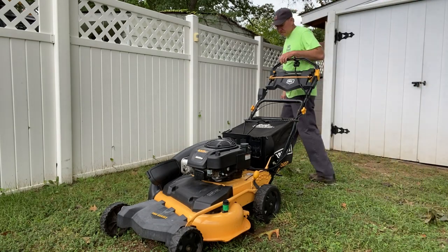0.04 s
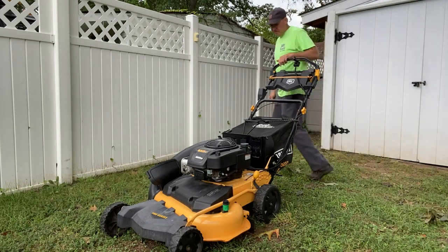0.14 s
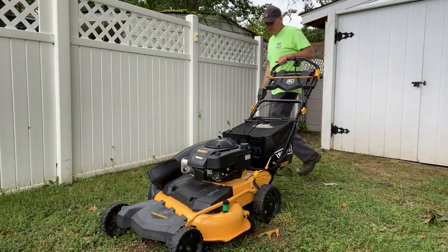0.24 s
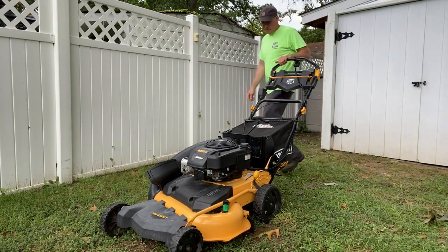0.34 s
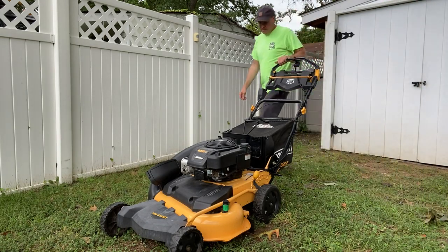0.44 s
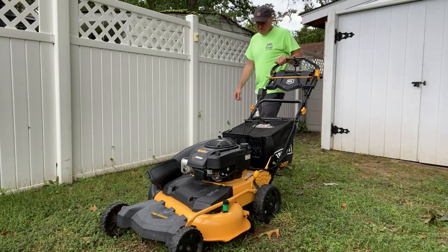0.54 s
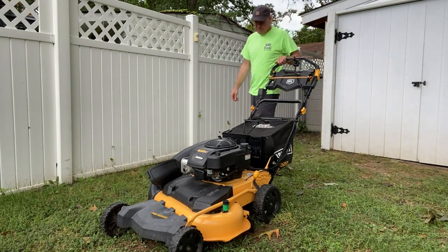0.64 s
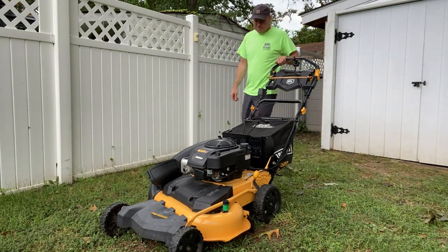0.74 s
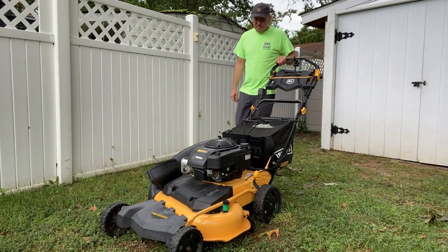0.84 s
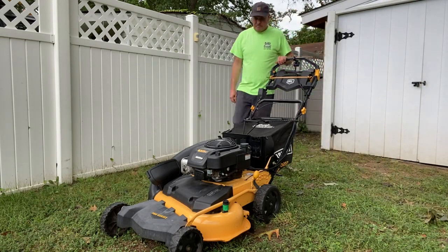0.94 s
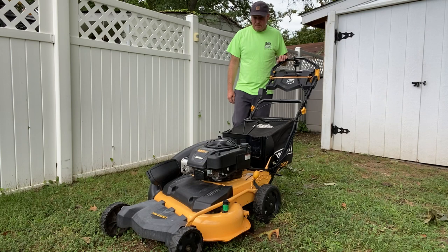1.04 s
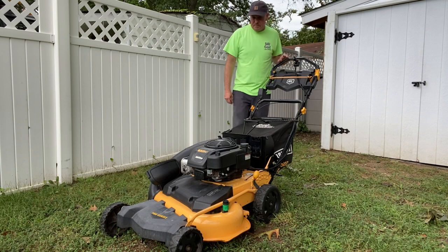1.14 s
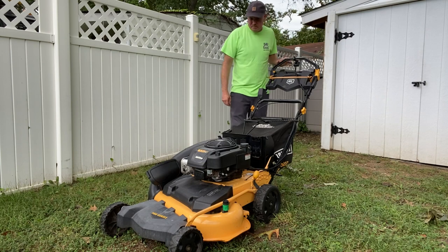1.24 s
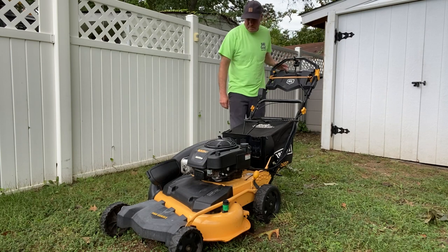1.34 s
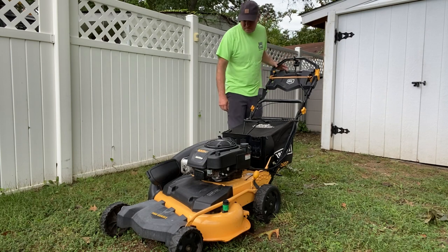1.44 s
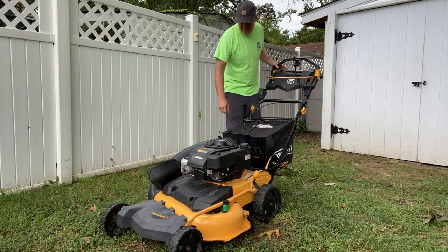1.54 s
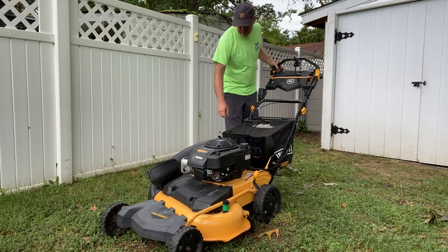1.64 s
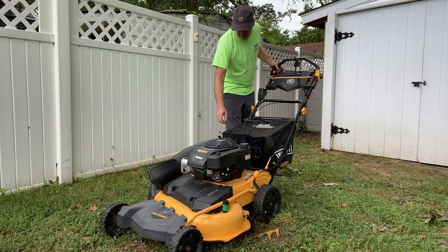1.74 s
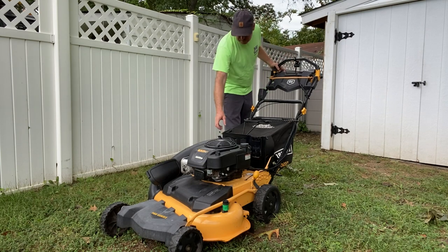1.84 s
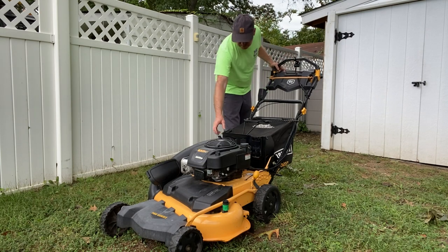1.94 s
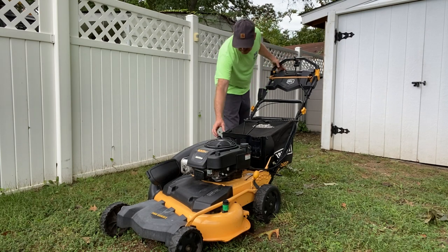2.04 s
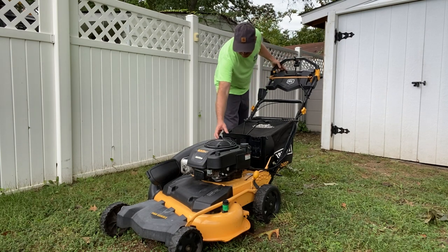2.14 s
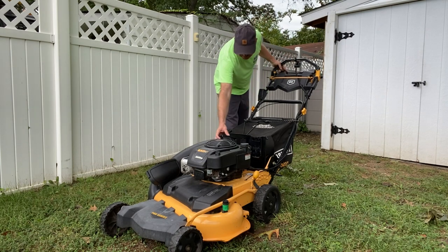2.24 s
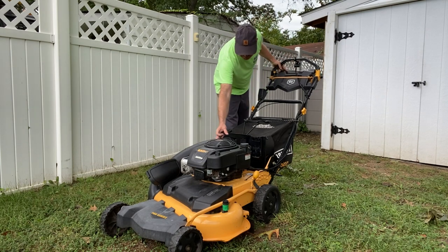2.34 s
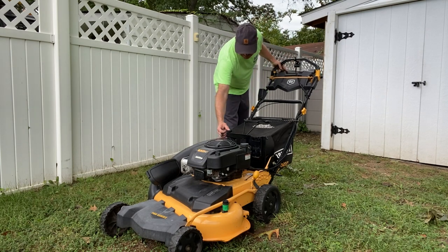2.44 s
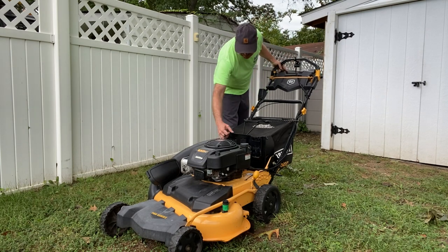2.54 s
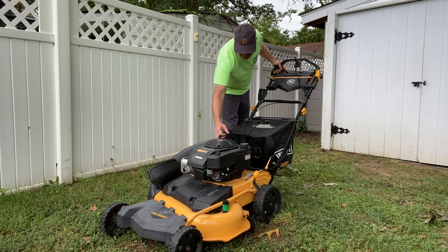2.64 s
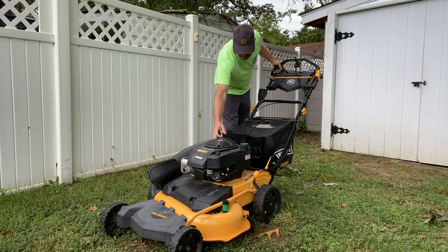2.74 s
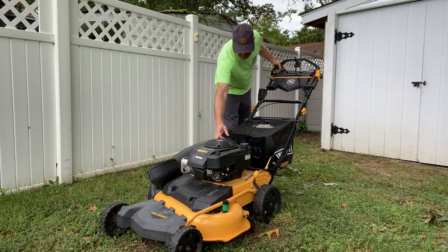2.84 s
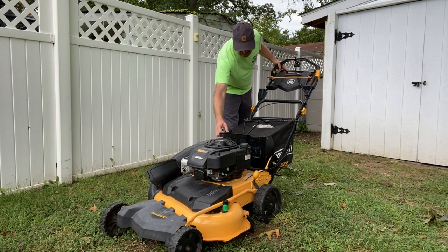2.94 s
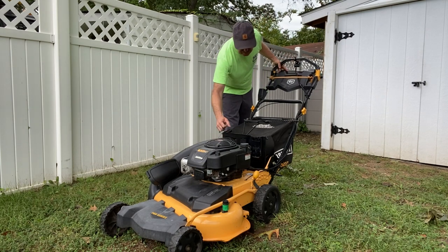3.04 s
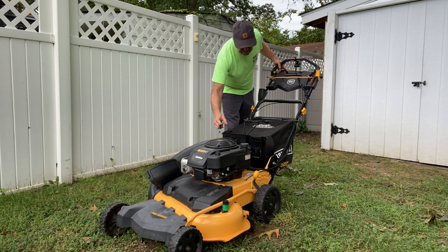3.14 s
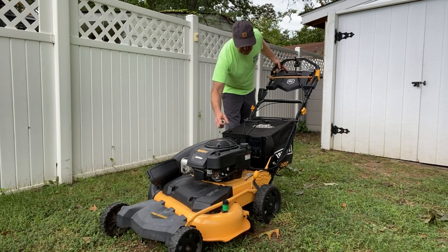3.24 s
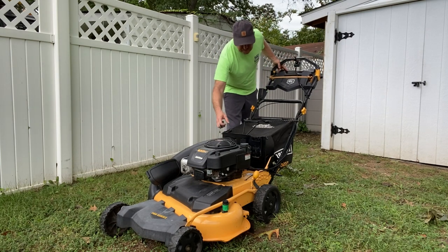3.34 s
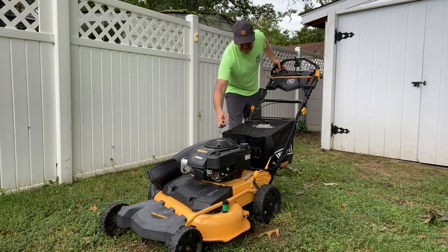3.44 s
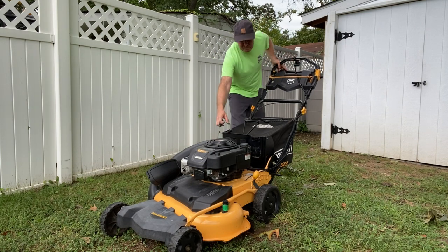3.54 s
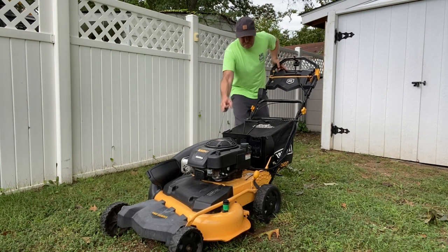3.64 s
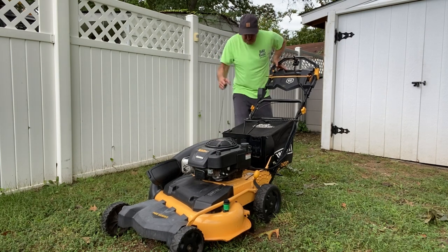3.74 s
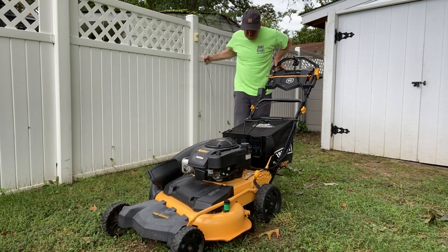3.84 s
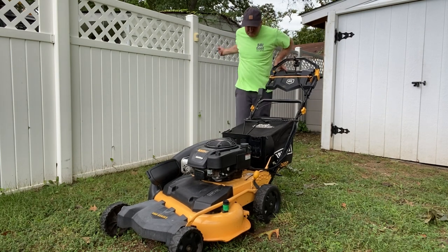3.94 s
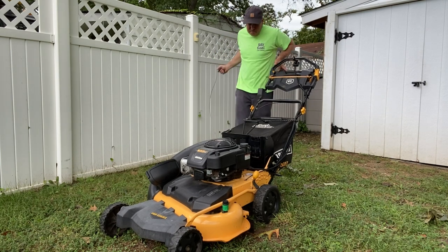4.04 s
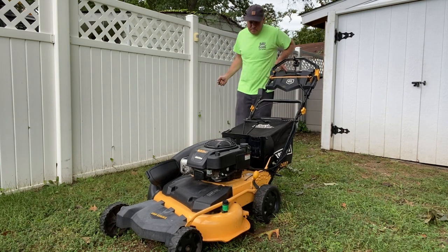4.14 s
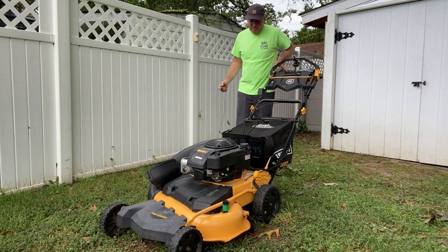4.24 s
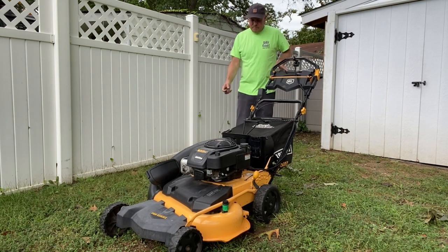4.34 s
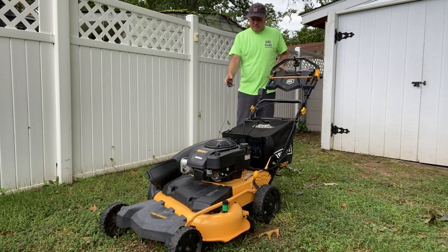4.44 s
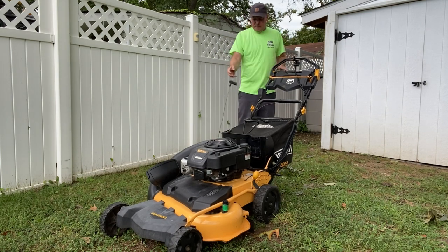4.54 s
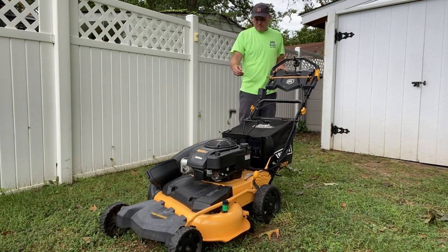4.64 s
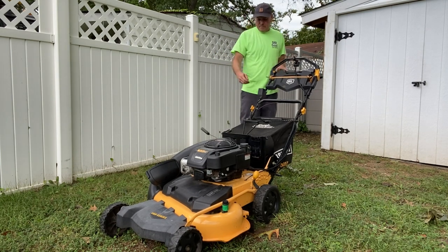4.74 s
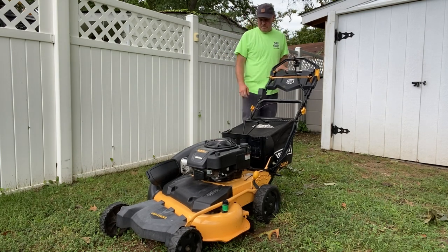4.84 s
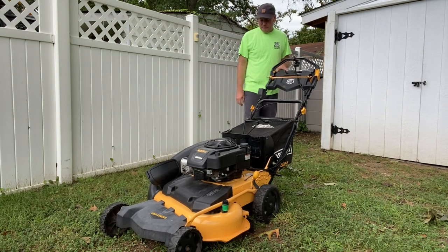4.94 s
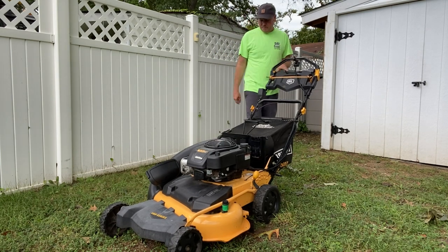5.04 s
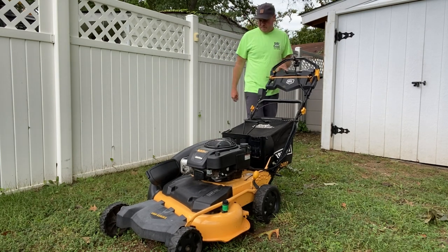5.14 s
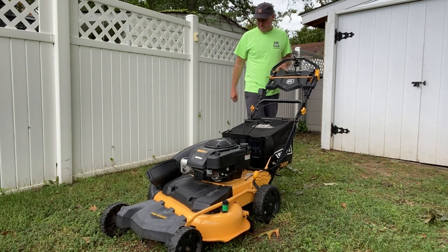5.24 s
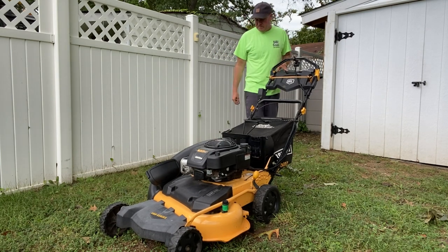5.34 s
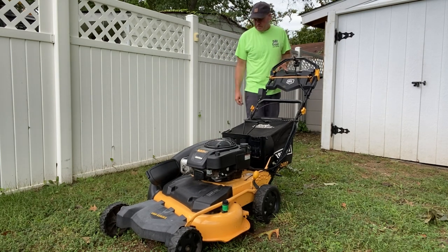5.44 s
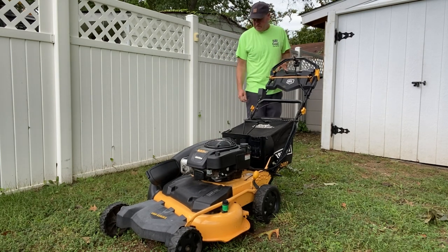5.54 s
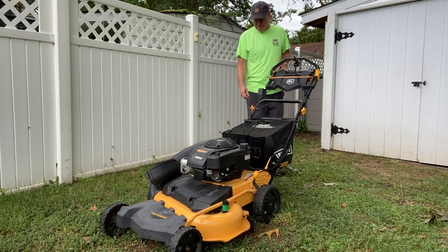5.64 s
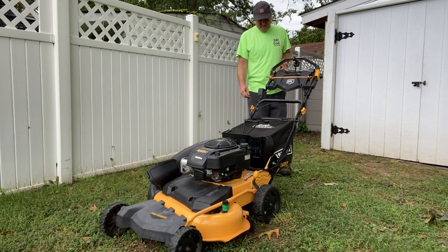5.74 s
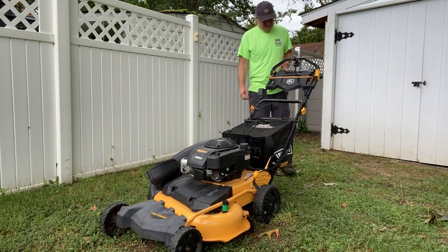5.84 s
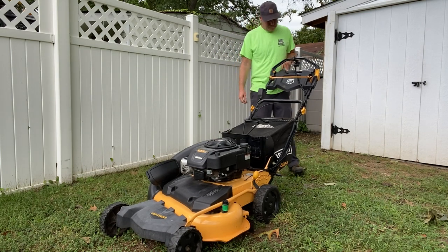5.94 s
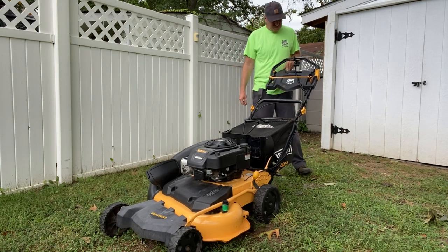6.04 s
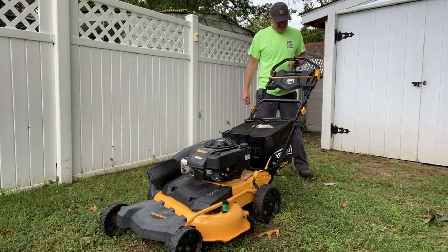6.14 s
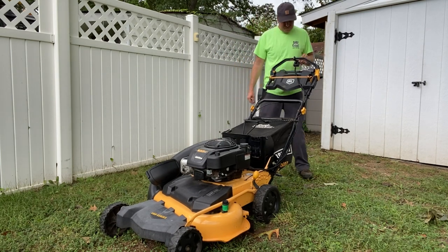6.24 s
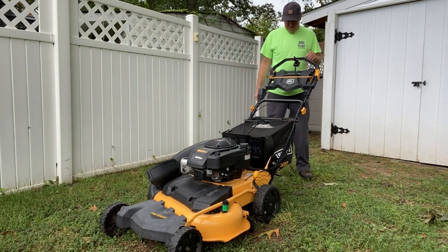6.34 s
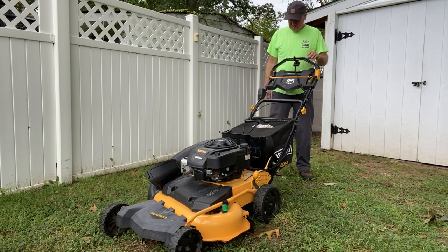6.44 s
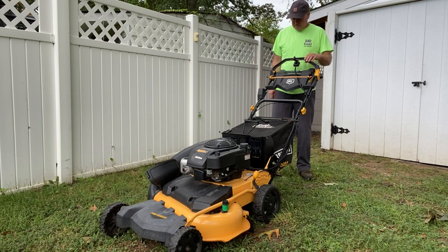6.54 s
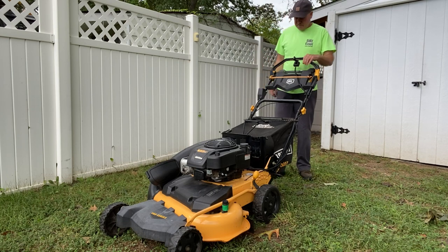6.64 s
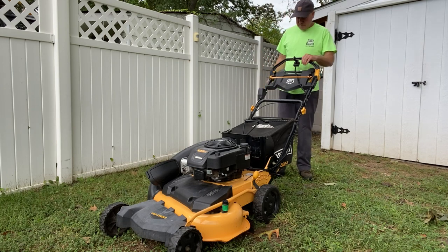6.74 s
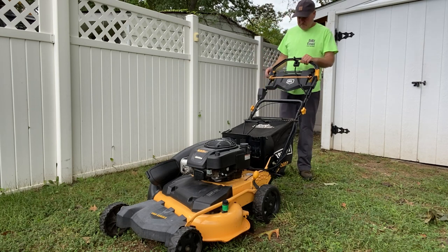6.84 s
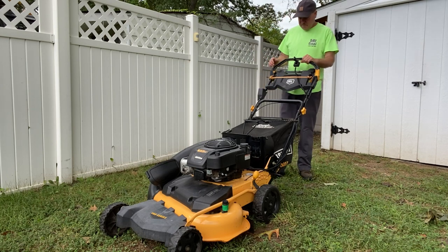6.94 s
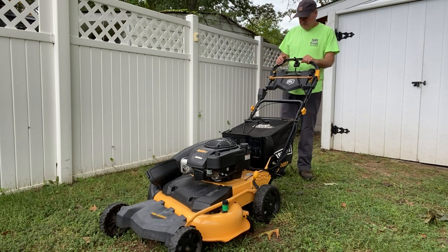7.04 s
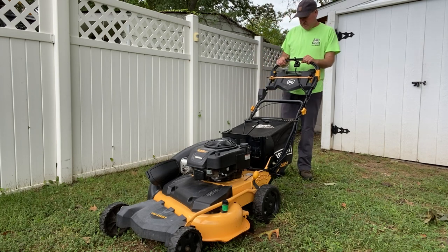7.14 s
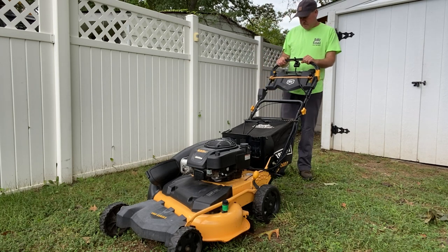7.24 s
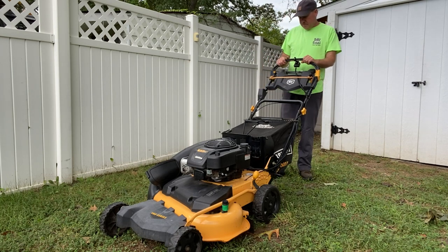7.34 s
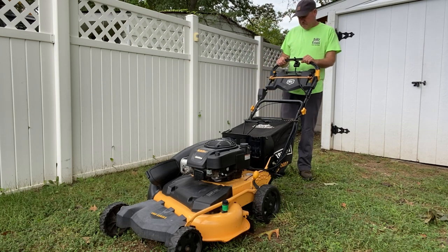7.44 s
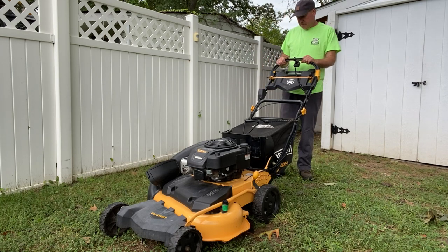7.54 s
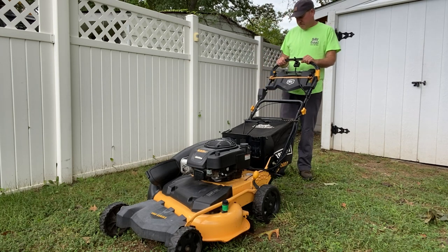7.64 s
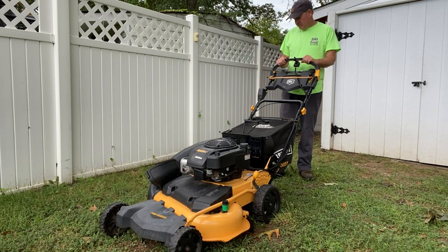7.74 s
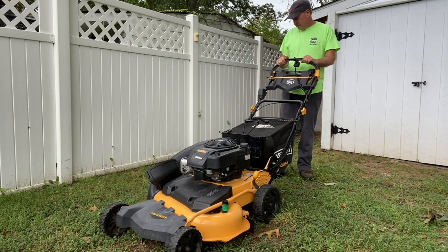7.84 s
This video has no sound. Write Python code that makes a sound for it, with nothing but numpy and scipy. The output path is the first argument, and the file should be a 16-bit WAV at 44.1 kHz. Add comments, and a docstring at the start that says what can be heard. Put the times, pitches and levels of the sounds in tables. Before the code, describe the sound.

A quiet fenced yard with far traffic rumble, thin insects and soft rustles of grass and cloth. Close by, a hand slides and knocks on a plastic starter grip. A cord is yanked with a rising whine and harsh rasp, and a single-cylinder mower fires at once, speeds up, misses a few beats, gets one hard knock, then runs steadily. Near, nearly centred stereo mower; wide yard around it.

```python
"""Push mower starting in a fenced yard

Insects and far traffic lie under rustles, a cricket and a hand fumbling with the starter grip.
The cord rasps and whines upward; a single-cylinder four-stroke catches, gathers speed, misses and settles.
Each firing gives a crack of torn noise and a low ring of the muffler.
Filtered noise, rapped resonators and crank-locked sines make the valve gear, fan and blade beneath.
"""
import sys
import numpy as np
from scipy import signal
from scipy.fft import rfft, irfft
from scipy.io import wavfile
from scipy.ndimage import uniform_filter1d

SR = 44100
rng = np.random.default_rng(int(sys.argv[2]) if len(sys.argv) > 2 else 0)


def wrap_up_sound(samples):
    """Save the sound to the file named by the first command line argument, as 16-bit audio."""
    columns = np.atleast_2d(samples).T
    # keep every value between -1 and 1, then stretch to whole-number steps
    tamed = np.clip(columns, -1, 1)
    steps = np.round(tamed * 32767).astype(np.int16)
    wavfile.write(sys.argv[1], SR, steps)


N = 347508


def undb(db):
    """dB to gain."""
    return 10 ** (np.asarray(db) / 20)


def level(x, db):
    """Scale to an rms level in dB."""
    return x * undb(db) / np.sqrt(np.mean(x ** 2))


def over_hz(table):
    """Read a table at every frequency bin, straight between points on a log frequency axis."""
    hz, value = np.transpose(table)
    return np.interp(np.log(np.arange(N // 2 + 1) * SR / N + 1), np.log(hz + 1), value)


def colour(x, table):
    """Equalise a sound with a curve of f/Hz, level/dB."""
    return irfft(rfft(x) * undb(over_hz(table)), N)


def band(x, hz, width):
    """Resonance with gain 1 at the centre."""
    return signal.lfilter(*signal.iirpeak(hz, hz / width, SR), x)


def fade(x, t60):
    """Each impulse becomes an exponential envelope, down 60 dB after t60 seconds."""
    return signal.lfilter([1], [1, -np.exp(-np.log(1000) / (t60 * SR))], x)


def impulses(times, gains):
    """One sample at each time."""
    x = np.zeros(N + SR)
    x[(np.asarray(times) * SR).astype(int)] = gains
    return x[:N]


def noise():
    """White noise."""
    return rng.standard_normal(N)


def walk(rate):
    """Random levels held 1 / rate s and slewed twice; spread near 1."""
    k = int(SR / rate)
    steps = np.repeat(rng.standard_normal(N // k + 1), k)
    return 1.3 * uniform_filter1d(uniform_filter1d(steps, k), k)[:N]


def curves(table, outside):
    """The columns of a table at every sample, with a set value before its first time."""
    s, *columns = np.transpose(table)
    return [np.interp(np.arange(N) / SR, s, c, outside, c[-1]) for c in columns]


def pair(a, b, like):
    """Stereo spectra: a is common, b goes opposite ways; the likeness sets their shares."""
    c = np.clip(over_hz(like), -.99, .99)
    mid = rfft(a) * np.sqrt((1 + c) / 2)
    side = 1j * rfft(b) * np.sqrt((1 - c) / 2)
    return np.array([mid + side, mid - side])


# Colour of the soft yard wash: [f/Hz, level/dB]
WASH_COLOUR = [(100, -12), (250, -4), (400, -11), (850, -10), (2700, -26.5), (9000, -30), (9900, -62),
               (16000, -75)]
# Fader ride of the far traffic: [t/s, level/dB]
TRAFFIC_RIDE = [(0, -46.5), (1, -47), (2, -44.5), (3, -44.5), (4, -49.5)]
# Insect bands: [f/Hz, width/Hz, level/dB before flutter]
INSECT_BANDS = [(3390, 600, -65), (4340, 120, -71.5), (5800, 1020, -57), (8410, 1160, -63)]
WASH_DB, TRAFFIC_SWELL_DB = -52.5, 0.5
# low rumble added by the running mower
MOWER_RUMBLE_DB, MOWER_RUMBLE_FROM_S, MOWER_RUMBLE_RISE_S = -77, 4, 0.17


def yard():
    """Low noise makes far traffic and the mower's low rumble; a soft wash and fluttering insect bands lie above."""
    wash = level(colour(noise(), WASH_COLOUR), WASH_DB) * undb(0.5 * walk(3.6))
    low_colour = [(20, -47), (38, -7), (60, 4.5), (110, 1.0), (220, -12), (400, -64.0)]
    low_noise = level(colour(noise(), low_colour), 0)
    traffic = undb(curves(TRAFFIC_RIDE, -45)[0] + TRAFFIC_SWELL_DB * walk(5.72))
    rise = np.clip((np.arange(N) / SR - MOWER_RUMBLE_FROM_S) / MOWER_RUMBLE_RISE_S, 0, 1)
    mower_rumble = undb(MOWER_RUMBLE_DB) * rise ** 2
    out = wash + low_noise * (traffic + mower_rumble)
    for hz, width, db in INSECT_BANDS:
        out += level(band(band(noise(), hz, width), hz, width), db) * undb(1.4 * walk(5.12))
    return out


# Rustles as someone moves about: [middle t/s, length/s, level/dB]
RUSTLE_SWELLS = [(.1, 1, -59), (.6, 1, -55.5), (2.253, 0.56, -54.5), (2.9, .5, -62)]
# Colour of grass and cloth: [f/Hz, level/dB]
RUSTLE_COLOUR = [(200, -16), (500, 4), (900, 1), (2000, -4.5), (3000, -8.5), (6000, -30), (16000, -60)]


def rustle():
    """Grass and cloth: coloured noise with a grainy level, swelling and fading."""
    t = np.arange(N) / SR
    swells = sum(undb(db) * np.cos(np.pi * np.clip((t - s) / length, -.5, .5)) ** 2
                 for s, length, db in RUSTLE_SWELLS)
    return swells * level(colour(noise() * undb(2.2 * walk(80)), RUSTLE_COLOUR), 0)


# Short high hisses, the first fainter: [t/s, strike level/dB]
HIGH_HISSES = [(0.345, -44), (0.6868, -33.5)]
# Faint squeaks: [start t/s, length/s, f/Hz, relative level/dB]
GRIP_SQUEAKS = [(2.19, .18, 3320, -55.5), (2.25, .1, 2050, -60), (2.61, .19, 2500, -51.5),
                (2.78, .07, 2500, -63), (2.6, .13, 4100, -54), (3.09, .05, 2520, -54),
                (3.1, .035, 2100, -56)]
# Hand sliding on plastic: [loudest t/s, level/dB, swell in dB/s, dying away in dB/s]
HAND_SLIDES = [(2.256, -73, 70, 25), (2.53, -43, 164, 57), (2.66, -45.5, 150, 90), (2.75, -47, 300, 110),
               (3.01, -47.5, 150, 206), (3.098, -42.5, 104, 270)]
# Knocks of grip and housing: [t/s, body level/dB, hollow level/dB, bright level/dB], relative strengths
GRIP_KNOCKS = [(2.254, -50, -62, -44), (2.332, -42, -67, -62), (2.507, -44, -54, -60),
               (2.546, -48, -63, -39), (2.577, -57, -64, -41), (2.659, -45, -67, -55),
               (2.731, -37, -69, -65), (2.765, -21, -55, -40), (2.868, -37.5, -66, -54),
               (2.944, -39.5, -44, -48), (3.01, -37, -59, -45), (3.057, -46, -62, -33.5),
               (3.085, -36.5, -35, -33), (3.094, -38, -25, -48), (3.554, -48, -46, -41),
               (3.582, -43.5, -41, -49), (3.673, -39, -49, -38), (3.721, -36, -29, -36),
               (3.737, -30, -18, -47), (3.777, -31, -38, -31.5), (4.724, -11.5, -26, -18)]
# Modes of the plastic housing: [f/Hz, level/dB, t60/s]
HOUSING_MODES = [(425.6, -11, 0.35), (649, -3.5, 0.13), (885, 0.5, 0.088), (1057, 2, 0.061),
                 (1470, 0, 0.081), (1614, -5.5, 0.05), (2484, -5.5, 0.026)]
HOLLOW_HZ, HOLLOW_FADE_S = 301, 0.066
TAUT_S, TAUT_HZ = 3.5, 272  # the hollow knock sounds lower once the cord is pulled


def handling():
    """Knocks ring the plastic housing; skin rubs over it in uneven slips, with squeaks and short hisses."""
    s, body_db, hollow_db, bright_db = np.transpose(GRIP_KNOCKS)
    t = np.arange(N) / SR
    bright = band(band(band(noise(), 2900, 3900), 3100, 6700), 3300, 6500)
    out = fade(impulses(s, undb(bright_db)), 0.08) * 2.0 * bright
    for hz, mode_db, t60 in HOUSING_MODES:
        strikes = impulses(s, undb(body_db + 4.6 * rng.standard_normal(len(s))))
        tone = np.sin(2 * np.pi * hz * t + 1.4 * walk(250))
        out += .5 * undb(mode_db) * fade(strikes, t60) * tone
    hollow = fade(fade(impulses(s, undb(hollow_db)), HOLLOW_FADE_S), HOLLOW_FADE_S)
    hollow_hz = np.where(t < TAUT_S, HOLLOW_HZ, TAUT_HZ)
    out += 0.0045 * hollow * np.sin(2 * np.pi * hollow_hz * t + 0.76 * walk(90))

    # the strongest slide wins at each moment
    rub_db = np.max([top_db - np.maximum(rise * (at - t), fall * (t - at))
                     for at, top_db, rise, fall in HAND_SLIDES], axis=0)
    slips = noise() * undb(3.8 * walk(90))
    rub = 1.0 * band(band(slips, 1600, 190), 1500, 400)
    rub += 0.72 * band(slips, 1100, 350) + .6 * band(slips, 480, 230)
    rub += 0.22 * band(band(band(slips, 2800, 2900), 3000, 4700), 3100, 4800)
    out += undb(rub_db) * level(rub, 0)

    for start, length, hz, tone_db in GRIP_SQUEAKS:
        swell = np.sin(np.pi * np.clip((t - start) / length, 0, 1)) ** 1.5
        tone = np.sin(2 * np.pi * hz * t + .9 * walk(150))
        out += undb(tone_db + 1 + 2 * walk(40)) * swell * tone
    s, hiss_db = np.transpose(HIGH_HISSES)
    hiss = band(band(noise(), 12800, 3500), 8000, 5000)
    return out + 1.24 * fade(impulses(s, undb(hiss_db)), 0.19) * hiss


# Chirrs of one cricket: [start t/s, length/s, level/dB]
CRICKET_CHIRRS = [(1.05, 0.81, -65.5), (3.42, .15, -58.5)]


def cricket():
    """A wavering 3110 Hz tone throbs unevenly with the wing strokes."""
    t = np.arange(N) / SR
    strokes = np.sin(2 * np.pi * np.cumsum(33 + walk(3.7)) / SR)  # near 33 Hz
    throb = np.maximum(strokes + .6, 0)
    chirrs = sum(undb(db) * np.sqrt(np.abs(np.sin(np.pi * np.clip((t - s) / length, 0, 1))))
                 for s, length, db in CRICKET_CHIRRS)
    return chirrs * level(throb * np.sin(2 * np.pi * 3110 * t + 1.0 * walk(250)), 0)


# Pull of the starter cord: [t/s, rasp level/dB, whine f/Hz, whine level/dB]
CORD_PULL = [(3.52, -58, 704, -82), (3.61, -47, 848, -76), (3.635, -45, 982, -39), (3.67, -38, 1520, -49),
             (3.695, -36, 2037, -48), (3.72, -34, 2460, -47), (3.755, -27, 2920, -44),
             (3.785, -41, 3360, -48), (3.81, -19.5, 3470, -63), (3.84, -17.5, 3500, -75),
             (4.0, -24.5, 3570, -84)]
# Partials of the whine: [multiple of the whine pitch, level/dB]
WHINE_PARTIALS = [(0.501, -17), (1, 1.5), (1.5, -14), (2.3, -15)]


def cord():
    """The cord rasps over its guide as rough noise; the starter whines upward in jittery partials."""
    rasp_db, hz, whine_db = curves(CORD_PULL, -99)
    rasp_colour = [(100, 16.0), (500, 1.0), (1300, 1.0), (4000, -8.5), (9000, -18.5), (10300, -22.0),
                   (13000, -34)]
    rasp = level(colour(noise(), rasp_colour), 0)
    whine = 0
    for multiple, db in WHINE_PARTIALS:
        turns = np.cumsum(multiple * hz * (1 + .035 * walk(600))) / SR
        whine = whine + undb(db + 4.5 * walk(70)) * np.sin(2 * np.pi * turns)
    return undb(rasp_db + 2.34 * walk(60)) * rasp + undb(whine_db) * whine


# Engine speed from the first firing on: [t/s, firing rate f/Hz]
ENGINE_SPEED = [(3.822, 10.15), (4.123, 21.31), (4.333, 28.0), (4.573, 25.07), (4.831, 27.38),
                (5.014, 26.21), (5.243, 26.68), (5.9, 26.83), (6.173, 26.16), (6.307, 27.35),
                (6.503, 26.76), (7.141, 26.7), (7.88, 26.47)]


def firings():
    """Integrate speed into firing times; give each sample its firing, seconds since it and share of the cycle."""
    turns = np.cumsum(curves(ENGINE_SPEED, 0)[0]) / SR
    t = np.arange(N) / SR
    times = np.interp(np.arange(int(turns[-1]) + 1), turns[turns > 0], t[turns > 0])
    k = np.maximum(np.searchsorted(times, t) - 1, 0)
    period = np.diff(times, append=2 * times[-1] - times[-2])
    return times, k, t - times[k], (t - times[k]) / period[k]


# Gas crack as the throttle moves: [t/s, level/dB before losses and scatter]
THROTTLE_RIDE = [(3.82, -12.5), (3.97, -10.5), (4.09, -13.5), (4.3, -14.5), (4.6, -16.5), (4.94, -18),
                 (5.09, -18), (5.8, -21.5), (6.2, -21), (6.78, -25.5), (7.3, -24), (7.56, -21),
                 (7.7, -23.5), (7.85, -20)]
# Charges that burn poorly: [t/s, ring change/dB, crack change/dB]
WEAK_CHARGES = [(4.524, -6.5, -6.5), (4.978, -9, -5), (5.841, -6, -4.5)]
# Charges that do not burn: [t/s]
MISSED_CHARGES = [4.374, 4.411, 4.449, 4.486, 5.016]
MISSED_RING_DB, MISSED_CRACK_DB, MISSED_HZ = -15.5, -32.5, 92
# base level; dB per tenfold slower speed; dB per dB of crack
RING_DB, RING_SLOW_DB, RING_PER_CRACK = -3, 12.5, 0.38
# muffler pitch with cold and hot gas; share of the way moved at each stroke
COLD_HZ, HOT_HZ, WARMING = 120, 138.5, 0.21


def charges(times):
    """Ring dB, crack dB and muffler Hz per firing: slow strokes ring louder, burnt gas warms the pitch up."""
    def nearest(s):
        """Index of the firing closest to a time."""
        return np.argmin(abs(times - s))

    gap = np.gradient(times)
    crack_db = np.interp(times, *np.transpose(THROTTLE_RIDE))
    ring_db = RING_DB + RING_SLOW_DB * np.log10(gap / gap[-1]) + RING_PER_CRACK * crack_db
    for s, ring_change_db, crack_change_db in WEAK_CHARGES:
        ring_db[nearest(s)] += ring_change_db
        crack_db[nearest(s)] += crack_change_db
    burnt = np.ones(len(times))
    burnt[[nearest(s) for s in MISSED_CHARGES]] = 0
    warmth = signal.lfilter([WARMING], [1, WARMING - 1], burnt)
    ring_hz = COLD_HZ + (HOT_HZ - COLD_HZ) * warmth
    return (np.where(burnt, ring_db, MISSED_RING_DB), np.where(burnt, crack_db, MISSED_CRACK_DB),
            np.where(burnt, ring_hz, MISSED_HZ))


# Fader ride of the running gear, shared with the hum: [t/s, level/dB]
WHIR_RIDE = [(3.8, -37), (3.9, -33.5), (3.98, -42.5), (4.38, -28.5), (4.62, -27.5), (4.73, -24),
             (4.85, -25.5), (7.88, -25.5)]
# Colour of fan and blade air: [f/Hz, level/dB]
AIR_COLOUR = [(40, -25), (120, -29), (300, -9.5), (600, -8.5), (900, -9.5), (2000, -15.5), (4000, -22),
              (9000, -52), (10300, -95), (13000, -74), (16000, -80)]
# Valve and rod knocks: [share of the cycle, level/dB before scatter]
VALVE_RAPS = [(.06, -8), (.27, -6.5), (.5, -11.5), (.79, -10.5), (.88, -4.5)]
# Tin shroud modes: [f/Hz, width/Hz, relative level/dB]
SHROUD_MODES = [(965, 48, 6), (1048.5, 93, 8), (1071, 20, 1.5), (1214.4, 29.6, 9), (1467, 66, 0),
                (1644, 64, -0.5)]
# Steel deck modes: [f/Hz, width/Hz, relative level/dB]
DECK_MODES = [(234.6, 25, -3.5), (375.7, 36, -1), (423, 62, -4), (525, 81, -5), (710, 100, -0.5)]


def machinery(times, share, crack_db):
    """Fan and blade air, loose clatter, and tin shroud and deck rung by valve gear and firings."""
    whir = undb(curves(WHIR_RIDE, -99)[0])
    gap = np.gradient(times)
    unsteady_db = 1.5 * rng.standard_normal((len(times), len(VALVE_RAPS)))
    raps = sum(impulses(times + at * gap, undb(db + unsteady_db[:, j]))
               for j, (at, db) in enumerate(VALVE_RAPS))
    bang_db = crack_db + 6.5 * rng.standard_normal(len(times))
    bang = undb(21.5) * band(band(impulses(times + 0.00295, undb(bang_db)), 1216.0, 33.0), 1214, 145)
    # neighbouring modes alternate in sign
    deck = sum((-1) ** j * undb(db) * band(band(raps, hz, w), hz, 2 * w) / w
               for j, (hz, w, db) in enumerate(DECK_MODES))
    out = []
    for _ in range(2):
        push = 0.55 * noise() + 55 * raps
        tin = sum(undb(db) * band(band(push, hz, w), hz, 3 * w) for hz, w, db in SHROUD_MODES)
        hits = (rng.random(N) < 260 / SR) * noise()  # about 260 random hits per second
        clatter = fade(hits, 0.0066) * band(band(noise(), 1600, 2500), 2100, 5000)
        pulse_db = walk(20) + 4.2 * np.cos(2 * np.pi * (share - .2))  # the air surges once a cycle
        air = level(colour(noise(), AIR_COLOUR), -4.5) * undb(pulse_db)
        gear = level(tin, -2.0) + air + level(clatter, -25.0) + level(deck, -8.0)
        out.append(whir * gear + 10 * bang)
    return out


# Blade and crank tones: [multiple of the firing rate]
HUM_MULTIPLES = [7, 9, 10, 11, 14, 15, 17, 21, 28, 34, 36, 39, 40, 42, 46]
# Their strengths in the same order: [level/dB over the whir ride, before wavering]
HUM_LEVELS = [-13, -12.5, -21, -11.5, -11, -17, -29, -20, -13, -8, -14, -18, -11.5, -8, -13]


def hum(k, share):
    """Sines locked to the crank, each wavering in level."""
    tones = sum(undb(db + 3.1 * walk(3.6)) * np.sin(2 * np.pi * order * (k + share))
                for order, db in zip(HUM_MULTIPLES, HUM_LEVELS))
    return np.sqrt(2) * undb(curves(WHIR_RIDE, -99)[0]) * tones


# Colour of the gas crack: [f/Hz, level/dB]
CRACK_COLOUR = [(880, -4), (1500, -1), (1880, -14), (2740, -7.5), (3060, -15.5), (4920, -5.5), (6430, -5),
                (7100, -8.5), (8740, -3.5), (10200, -17.5), (12000, -16.5), (13500, -11), (14200, -37),
                (16000, -45)]
BRIGHTEN = 0.42  # a harder crack is brighter: dB in the bands above 10 kHz per dB of crack
INTAKE_SHARE, INTAKE_DB = 0.917, -23.5  # breath just before the next crack: share of cycle, strike dB


def cracks(times, k, crack_db):
    """Gas rips through the opening valve; the fence returns it once, the yard smears a tail."""
    blows = impulses(times, undb(crack_db))
    burst = fade(fade(blows, 0.0078), 0.011) * 0.065
    echo = np.roll(burst, int(0.0071 * SR))
    shape = burst + undb(-10) * echo + undb(-11.5) * fade(blows, 0.12)
    intake = impulses(times + INTAKE_SHARE * np.gradient(times), undb(crack_db + INTAKE_DB))
    shape += fade(intake, 0.08)
    grain = undb(2.5 * walk(500))  # the jet tears into eddies
    centres = 1500 * 1.18 ** np.arange(15)  # Hz
    tint = undb(2.7 * rng.standard_normal((len(times), len(centres))))  # each charge favours other bands
    tint /= np.sqrt(np.mean(tint ** 2, axis=1, keepdims=True))
    tint *= undb(BRIGHTEN * np.outer(crack_db - crack_db.mean(), centres > 10000))
    out = []
    for _ in range(2):
        gas = sum(tint[k, j] * band(noise(), hz, hz / 8) for j, hz in enumerate(centres))
        out.append(undb(1) * shape * grain * level(colour(gas, CRACK_COLOUR), 0))
    return out


# Exhaust pipe modes: [f/Hz, width/Hz, relative level/dB]
PIPE_MODES = [(110, 70, -37), (494, 84, -7), (550, 21, -14), (790, 60, -0.5), (955, 15, -6)]
# ring decay in s at a crack of -14 dB, before limits and slowness; dB of decay time per dB of crack
RING_S, RING_S_PER_DB = 0.011, -2.5
# slow strokes start high and sag low, by slowness up to a limit
SAG_S, SAG_UP, SAG_DOWN, SLOW_MOST = 0.0055, 3.7, 1.01, 0.68


def exhaust(times, k, age, ring_db, ring_hz, crack_db):
    """The muffler rings for a few swings, its pitch sagging as the hot gas thins out."""
    age = np.maximum(age - .002, 0)
    gap = np.gradient(times)
    quick = gap[-1] / gap  # speed as a share of the settled speed
    hard = 0.04 * np.maximum(crack_db + 17, 0)  # hard strokes behave like slow ones
    slow = np.clip(1 / quick - 1 + hard, 0, SLOW_MOST)[k]
    sag = SAG_UP * SAG_S * (1 - np.exp(-age / SAG_S)) - SAG_DOWN * age
    cycles = ring_hz[k] * (age + slow * sag)
    cycles += (0.34 - 0.93 * slow) * (1 - np.exp(-age / 0.0013))
    dies = np.clip(RING_S * undb(RING_S_PER_DB * (crack_db + 14)), 0.008, 0.035)
    swell = (1 + 0.7 * slow) * (1 - np.exp(-age / (0.001 + 0.004 * slow))) ** 2
    swell *= np.exp(-age / (dies[k] + 0.007 * slow))
    # a soft gate closes the ring, later on slow strokes
    swell /= 1 + np.exp(np.clip((age - 0.0245 - 0.02 * slow) / 0.0015, -30, 30))
    ring = -1.3 * undb(ring_db[k]) * swell * np.sin(2 * np.pi * cycles)
    blows = impulses(times + 0.00312, undb(ring_db))
    pipe = sum((-1) ** j * undb(db) * band(blows, hz, w) * 400 / w
               for j, (hz, w, db) in enumerate(PIPE_MODES))
    # fired or not, the piston pumps air out and in once each cycle
    pump = impulses(times + 0.446 * gap, 1.0) - impulses(times + 0.414 * gap, 0.12)
    # the slow first strokes rock the deck with a deep thump
    thump = impulses(times + 0.0068, undb(ring_db) * (1 / quick - 1))
    low_pump = undb(31.5) * band(band(pump, 63, 55), 24, 73)
    low_thump = undb(29) * band(band(thump, 75, 36), 68, 87)
    return ring + undb(4.5) * pipe + low_pump + low_thump


# Metal casing modes: [f/Hz, width/Hz (not played), level/dB (quartered when played)]
CASING_MODES = [(2810, 130, -10), (3260, 86, 18), (4160, 41, 29), (4045, 52, 28), (5030, 230, 2),
                (5570, 49, 24), (6500, 540, -4), (7500, 380, -5), (9040, 300, -9)]
# drive; scatter per stroke; latest rattle after firing
CASING_DB, CASING_SCATTER_DB, CASING_LATE_S = 7.5, 4, 0.014


def casing(times, crack_db):
    """Each stroke shakes the casing a little late, exciting its modes with fresh strengths and delays."""
    chance = rng.random((len(times), len(CASING_MODES)))
    scatter = CASING_SCATTER_DB * rng.standard_normal((len(times), len(CASING_MODES)))
    out = np.zeros(N)
    for j, (hz, _, db) in enumerate(CASING_MODES):
        hit_db = crack_db + CASING_DB - 17 + db / 4 + scatter[:, j]
        hits = impulses(times + CASING_LATE_S * chance[:, j], undb(hit_db))
        out += SR / 300 * band(hits, hz, 120) / 3.6
    return out


def engine():
    """All parts follow one crank; every charge burns a little differently."""
    times, k, age, share = firings()
    ring_db, crack_db, ring_hz = charges(times)
    chance = rng.standard_normal((len(times), 2)).T
    low = exhaust(times, k, age, ring_db + 0.1 * chance[0], ring_hz, crack_db) + hum(k, share)
    high = np.add(cracks(times, k, crack_db + 0.94 * chance[1]), machinery(times, share, crack_db))
    low += casing(times, crack_db)
    return high[0] + low, high[1] + low


# Stereo likeness of mower and hand: [f/Hz, likeness from -1 to 1]
NEAR_LIKENESS = [(60, 0.95), (250, 1), (500, 0.97), (1000, 0.82), (2000, 1), (4000, 0.7), (8000, 1),
                 (15000, 0.99)]
# Stereo likeness of the yard: [f/Hz, likeness from -1 to 1]
YARD_LIKENESS = [(60, 0.92), (130, 0.85), (290, 0.54), (640, -0.36), (1410, -0.045), (3100, -0.13),
                 (6820, 0.28), (15000, -0.22)]
# Balance of the near sounds: [f/Hz, left minus right level/dB]
NEAR_LEAN = [(60, -1), (110, 2), (200, 1), (380, 3), (700, -1), (1290, 1), (2380, -1), (4400, 0.5),
             (8120, 0), (15000, 0)]
# Phase between the channels for the near sounds: [f/Hz, left lead/rad]
NEAR_LEAD = [(0, -3), (690, 0.9658), (1550, -0.9), (4740, -1), (5430, 1.27), (6120, 0.9), (7060, -1.5),
             (8350, 1.06), (9910, 2.5), (11300, 4.5), (12100, 7.5), (13700, 7), (14600, 15), (16100, -21)]
YARD_LEAN_DB = 0.5  # left minus right


def scene():
    """The mower stands near and almost in the middle; the yard lies all around."""
    hand = cord() + handling()
    a, b = engine()
    # a 4 ms fade keeps the end from wrapping round to the start
    end = np.minimum(np.arange(N, 0, -1) / (.004 * SR), 1)
    near = pair(end * (a + hand), end * (b + np.roll(hand, 90)), NEAR_LIKENESS)
    lean, lead = over_hz(NEAR_LEAN) / 2, over_hz(NEAR_LEAD) / 2
    near *= undb([lean, -lean]) * np.exp(1j * np.array([lead, -lead]))
    around = pair(yard() + cricket() + rustle(), yard() + rustle(), YARD_LIKENESS)
    around *= undb([[YARD_LEAN_DB / 2], [-YARD_LEAN_DB / 2]])
    return irfft(near + around, N)


TOP_HZ = 16300


def record(dry):
    """Cut the deepest bass, round the loudest peaks with a tanh curve and cut the top."""
    dry = signal.sosfilt(signal.butter(6, 44, "high", fs=SR, output="sos"), dry)
    rounded = 1.088 * np.tanh(dry / 1.55)
    return signal.sosfilt(signal.ellip(8, .2, 70, TOP_HZ, fs=SR, output="sos"), rounded)


dry = scene()
out = record(dry)
wrap_up_sound(out)
```